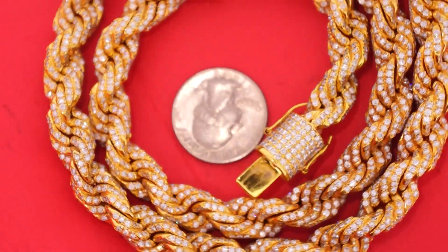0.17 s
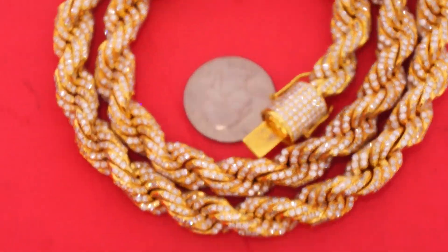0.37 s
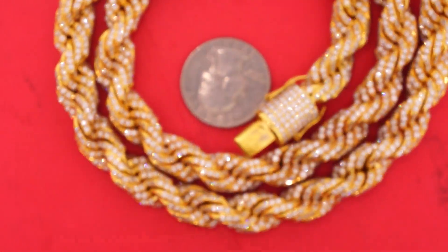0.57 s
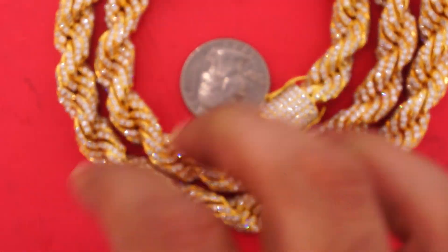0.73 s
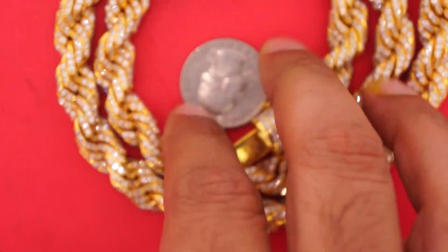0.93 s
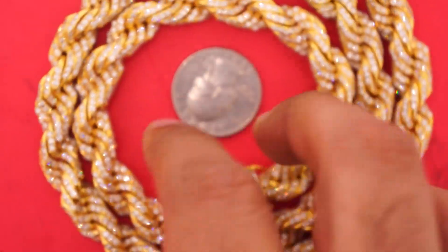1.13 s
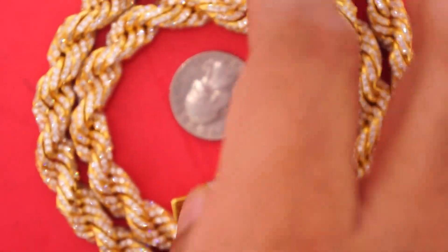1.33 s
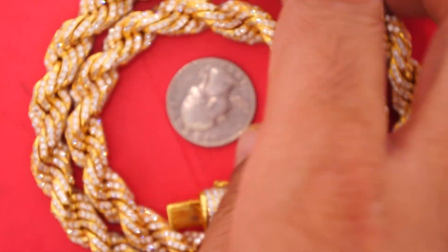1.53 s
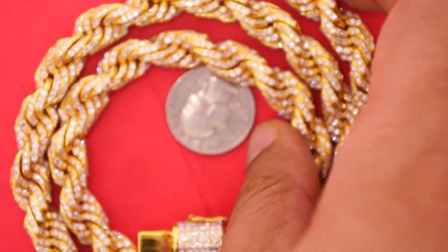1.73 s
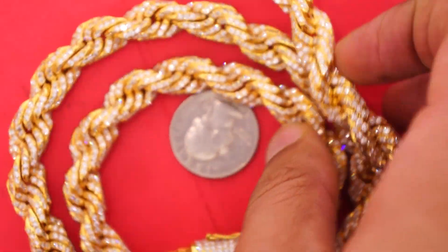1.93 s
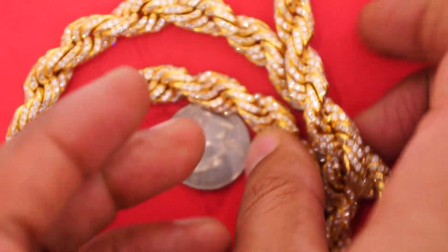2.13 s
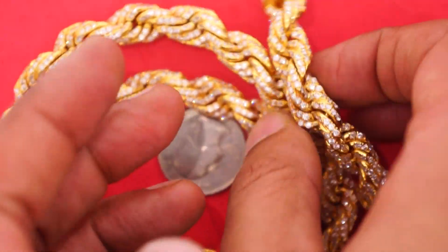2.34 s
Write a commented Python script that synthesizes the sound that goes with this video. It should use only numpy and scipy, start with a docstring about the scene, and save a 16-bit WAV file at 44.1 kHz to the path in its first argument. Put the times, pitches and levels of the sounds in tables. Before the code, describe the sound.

Heavy metal rope chain pushed and gathered on a hollow table, gritty slides, snapping links, dull thumps

```python
"""A quiet room's noise and low hum come first; then hands push and gather a heavy rope chain on a table.
The links slide over the cloth with a gritty hiss, made of dense random clicks filtered band by band.
They snap together in short bursts of the same grit, and rub and thump the hollow top, which booms near 320 Hz.
Resonances make the links ring on contact and sing when drawn taut. A heavy strand makes the top groan,
and late on a coin is brushed once."""
import sys
import numpy as np
from scipy import signal
from scipy.io import wavfile

SR = 44100
rng = np.random.default_rng(int(sys.argv[2]) if len(sys.argv) > 2 else 0)


def unload_audio(sound):
    """Save the sound as a 16-bit wav file, at the path given as the first command line argument."""
    columns = np.transpose(np.atleast_2d(sound))
    # keep every value between -1 and 1, then stretch to whole-number steps
    steps = np.round(np.clip(columns, -1, 1) * 32767)
    wavfile.write(sys.argv[1], SR, steps.astype(np.int16))


N = 110250   # 2.5 s of samples

# Spectrum of the room noise: pitch_hz, relative_level_db (per Hz)
ROOM_SPECTRUM = [(15, -26), (25, -7.5), (72, 1), (317, -1.5), (560, -3), (754, -2), (1020, -8),
                 (1890, -19.5), (2610, -17), (3340, -4), (4870, -49), (12900, -32), (16000, -66)]
# Resonances of the low hum: pitch_hz, width_hz, relative_level_db
HUM_MODES = [(58, 11, 0), (110, 25, -5)]
# Level of the low hum: time_s, level_db
HUM_LEVEL = [(0.0, -53.5), (1.08, -42), (1.13, -46.5), (2.5, -44.5)]
# How alike left and right are in the banded noises: pitch_hz, likeness (0 to 1)
STEREO_LIKENESS = [(60, 0.9), (180, 1), (550, 0.25), (1650, 0.47), (4970, 0.31), (15000, 0.25)]
# How far left and right differ in level: pitch_hz, left_minus_right_db
STEREO_LEAN = [(60, -1), (380, 2), (2380, -2), (15000, -1.5)]
# Chain sliding on the cloth: time_s, relative_level_db, brightness_db_per_octave
SLIDE_CURVE = [(0, -58, -2.5), (.13, -48, -5.5), (.23, -40, -1.5), (.3, -30, -7), (.41, -38, -1),
               (.55, -38.5, -6), (.6, -32.5, -7), (.66, -34, -7.5), (.69, -46, -6.5), (.72, -44, -10.5),
               (.76, -56, -7.5), (.9, -67, 0), (.92, -46.5, -7), (.97, -58.5, 0.5), (1.03, -38, -1),
               (1.11, -41.5, -5), (1.2, -51.5, -3.5), (1.39, -56.5, -5.5), (1.45, -44.5, -4),
               (1.53, -46.5, -3), (1.6, -41.5, -2), (1.72, -41.5, -2.5), (1.8, -46.5, -3.5),
               (1.96, -51.5, -2), (2.09, -47, -3), (2.16, -51, -5.5), (2.33, -53.5, -3), (2.37, -47, -3),
               (2.43, -58, -1.5), (2.5, -54, -3.5)]
# Spectrum of the sliding hiss: pitch_hz, relative_level_db (per Hz)
SLIDE_SPECTRUM = [(450, -24.5), (1000, -17.5), (2000, -12.5), (3300, -7), (5000, -8.5), (8000, -8.5),
                  (12000, -12.5), (15700, -15.5)]
# Weight of the chain rubbing the top: time_s, boom_level_db, upper_modes_relative_db, below_boom_level_db
RUB_CURVE = [(0.0, -61.5, -56.5, -48), (0.24, -50, -34, -60.5), (0.31, -47, -26, -44),
             (0.37, -42.5, -39, -52), (0.46, -36.5, -34, -55), (0.48, -44, -28, -43), (0.54, -28, -45, -45),
             (0.585, -34, -28, -21), (0.67, -35, -37.5, -36), (0.75, -36, -50.5, -31),
             (0.88, -43.5, -59.5, -52), (0.9, -52, -67, -48), (0.91, -46, -50, -60),
             (0.93, -51, -54.5, -35), (0.98, -42.5, -51.5, -43.5), (1.04, -31, -43, -41.5),
             (1.2, -56.5, -52.5, -51.5), (1.38, -61, -66, -52.5), (1.44, -49.5, -54.5, -45.5),
             (1.69, -41.5, -49, -51), (2.03, -45, -59.5, -41.5), (2.11, -39.5, -59, -53),
             (2.2, -32.5, -49.5, -35.5), (2.25, -43, -64, -42), (2.35, -34.5, -61, -43.5),
             (2.5, -61, -71, -54)]
# Air and panel of the hollow top, one after the other: pitch_hz, width_hz
BOOM_STAGES = [(312, 26.2), (338, 97)]
# Resonances of the top below the boom: pitch_hz, width_hz, relative_level_db
UNDER_BOOM_MODES = [(118, 10.6, -2.5), (181, 107, -2), (211, 74, 1.5)]
# Upper resonances of the top: pitch_hz, width_hz, relative_level_db
UPPER_TOP_MODES = [(417, 50, -9.5), (627, 8.4, -6), (704.5, 43, -6), (757, 30, -3.5), (851, 77, -6),
                   (1045, 17, -18.5), (1172, 27, -7.5), (1450, 51, -7.5), (1645, 59, -8.5),
                   (1923, 70, -5.5), (2260, 51, -10), (2535, 450, -22), (3257, 50, -17)]
# Thumps on the top: start_s, level_db, upper_modes_db (compared with the thump)
THUMP_HITS = [(0.167, -31, -34), (0.38, -36, -31), (0.474, -24.5, -29), (0.562, -16.5, -9.5),
              (0.582, -16, -30), (0.699, -35, -2.5), (0.74, -31, -10), (0.769, -25, -27), (0.91, -15, -18),
              (0.93, -26, -32), (1.037, -32.5, -39), (1.085, -36, -11), (1.524, -22.5, -23.5),
              (1.58, -29.5, -25), (1.631, -41, -27), (1.66, -30.5, -22), (1.819, -27, -44),
              (1.891, -28.5, -37), (2.044, -35.5, -36), (2.167, -41, -22), (2.196, -23.5, -34),
              (2.214, -26, -21), (2.313, -39, -18), (2.351, -32, -13)]
# Resonances of the chain links: pitch_hz, width_hz, relative_level_db
CHAIN_MODES = [(4920, 43, 1.5), (6150, 54, 2), (1913, 58, 1.5), (1684, 57, -2.5), (2543, 53, -16.5),
               (3327, 130, 3.5), (8240, 19, -18), (9890, 48, 8), (14700, 990, -8)]
# Links singing while a taut strand is drawn along: time_s, level_db
SING_LEVEL = [(0, -63), (.2, -49), (.58, -42.5), (.66, -44), (.74, -77), (.99, -68), (1.02, -43),
              (1.105, -46), (1.16, -78), (1.4, -72), (1.74, -60), (1.8, -53), (1.86, -61), (1.93, -56.5),
              (2, -68), (2.11, -52), (2.2, -82)]
# Links snapping together:
# start_s, relative_level_db, centre_hz, width_octaves, attack_s, fall_by_60_db_s, left_minus_right_db
SNAP_BURSTS = [(0.166, -24.5, 1570, 0.52, 0.00058, 0.24, -1), (0.236, -2, 3400, 0.39, 0.0027, 0.051, -0.5),
               (0.239, -7, 980, 0.17, .003, 0.12, -4), (0.2862, -3, 4170, 1.14, 0.0045, 0.059, -1),
               (.291, -8, 1490, .8, 0.0042, 0.039, -7), (0.301, -19, 4100, 2.2, 0.00092, 0.23, 1),
               (0.494, -14, 1920, 0.44, 0.0021, 0.12, 0), (0.5645, -5.5, 1600, 0.72, 0.0015, 0.047, 0.5),
               (.575, 0, 4700, 0.81, 0.00034, 0.018, -1), (0.645, -11, 2680, 0.27, 0.0021, 0.094, 2),
               (0.668, -10.5, 6150, 0.83, 0.0032, 0.029, 0), (0.705, -24, 3500, 1.06, 0.0046, 0.061, 1),
               (0.908, -34, 9000, 6.1, 0.0011, 0.04, -1), (.9805, -29.5, 14100, 0.54, .002, 0.068, -4),
               (1.021, -31, 6000, 0.89, 0.0025, 0.092, 0), (1.223, -39, 5860, 0.72, .005, 0.52, 0),
               (1.423, -37.5, 4460, 1.07, 0.004, 0.34, -4), (1.51, -29, 3730, 0.86, 0.0014, 0.048, -2),
               (1.569, -13, 15700, 0.3, 0.005, 0.039, 0), (1.588, -20, 14300, 0.57, .003, 0.085, -2),
               (1.672, -27, 13000, 2.1, .002, 0.086, -1), (1.712, -20.5, 4900, 0.5, 0.0034, 0.093, 2),
               (1.819, -22, 14500, 5, 0.0014, 0.041, -2), (1.861, -21, 14500, 1.6, 0.0073, 0.11, -1),
               (1.883, -27, 14000, 2.2, 0.0021, 0.18, 0), (1.977, -20, 15400, 0.52, 0.002, 0.16, 0),
               (2.001, -15, 13300, 1.44, 0.0022, 0.038, -0.5), (2.02, -25, 14200, 0.34, 0.005, 0.26, -6),
               (2.052, -32.5, 9000, 1.5, .002, 0.27, 2), (2.059, -18.5, 14500, 0.45, 0.003, 0.075, -1),
               (2.087, -29.5, 3800, 0.86, 0.0012, 0.089, -2), (2.197, -31, 13800, 3.2, 0.0087, 0.12, -1),
               (2.2616, -32, 13000, 0.8, 0.0016, 0.046, -2), (2.28, -34.5, 13700, 0.27, .004, 0.34, -2),
               (2.339, -28, 13900, 0.46, .001, 0.31, -4), (2.35, -23.5, 4880, 1.03, 0.0026, 0.04, 2),
               (2.387, -27, 12900, 5, 0.0032, 0.041, 2)]
# Single hard knocks of one link on another: start_s, level_db
KNOCKS = [(0.24, -23), (0.563, -22), (.5757, -19.5), (0.624, -20), (.6282, -16)]
# Groan of the top: pitch_hz, width_hz, relative_level_db
GROAN_MODES = [(176, 18, -6), (355, 10, 2), (585, 20, -8), (752, 25, -2)]
# Heavy strand hauled across the top: time_s, level_db
HAUL_LEVEL = [(.45, -90), (.475, -28), (.545, -25), (.575, -90)]
# Resonances of the coin: pitch_hz, width_hz, relative_level_db
COIN_MODES = [(8930, 40, -2), (12200, 70, -4), (15200, 50, 0), (13900, 60, -14)]
# One brush of the coin: time_s, level_db
COIN_BRUSH_LEVEL = [(2.345, -90), (2.353, -46), (2.39, -50), (2.415, -60), (2.43, -90)]
# Echo delays of the two nearby walls, left then right: delay_s
WALL_DELAYS = (0.0079, .0113)

SIDES = np.array([[1], [-1]])   # left, right
GRIT_PER_S, GRIT_SPREAD_DB = 5000, 1.5   # average contacts a second; unevenness of their sizes
ROOM_DB, ROOM_FLICKER_DB = -59.5, 1.5
SLIDE_GAIN_DB = 8.5
RUB_UPPER_GAIN_DB, RUB_FLUTTER_DB = -4, 1.5
UNDER_THUMP_DB = -13.5   # share of a thump below the boom
CONTACT_HZ = 720   # thumps are dull above this
LINK_SOFT_HZ = 1500   # soft link contacts favour the low modes
SNAP_GAIN_DB = -12
SNAP_SPREAD_DB = 3.5   # snaps hold a few contacts much harder than the rest
SLIDE_RING_DB = -6   # sliding links ring less freely than snapping ones
SMALL_LINKS, SMALL_LINK_Q, SMALL_LINK_DB = 40, 122, 1   # count; pitch divided by width; gain
ECHO_DB = -12
CUTOFF_HZ = 15900


def amp(db):
    """Turn decibels into a gain."""
    return 10 ** (np.asarray(db) / 20)


def rms_one(x):
    """Scale to an average (rms) strength of 1."""
    return x / np.sqrt(np.mean(x ** 2) + 1e-20)


def in_time(rows):
    """Draw straight lines between a table's rows, giving each column a value per sample."""
    time_s, *columns = np.transpose(rows)
    return [np.interp(np.arange(N) / SR, time_s, column) for column in columns]


def at_hz(points, hz):
    """Read a table at one pitch, with pitch spaced by octaves."""
    pitch_hz, value = np.array(points).T
    return np.interp(np.log(hz), np.log(pitch_hz), value)


def drift(rate_hz):
    """Slow random wander of spread 1: smoothed noise, one point every 40 samples."""
    r = np.exp(-80 * np.pi * rate_hz / SR)
    noise = rng.standard_normal(N // 40 + 2002)
    slow = signal.lfilter([1], [1, -2 * r, r * r], noise)[2000:]   # drop the filter's start-up
    return np.interp(np.arange(N) / 40, np.arange(len(slow)), rms_one(slow))


def resonate(x, hz, width_hz):
    """One resonance with gain near 1 at its peak; a narrow one rings longer."""
    r = np.exp(-np.pi * width_hz / SR)
    ring = [1, -2 * r * np.cos(2 * np.pi * hz / SR), r * r]
    return signal.lfilter([1 - r, 0, r - 1], ring, x + 1e-18)   # tiny offset keeps the arithmetic quick


def body(x, modes):
    """Resonances side by side, every second one flipped in sign."""
    return sum(amp(db) * (-1) ** k * resonate(x, hz, width_hz)
               for k, (hz, width_hz, db) in enumerate(modes))


def grit(shape, spread_db=GRIT_SPREAD_DB):
    """Dense small contacts at random moments, of uneven size and random sign."""
    sizes = amp(spread_db * np.minimum(rng.exponential(1, shape), 5))
    signs = rng.choice([-1, 1], shape)
    touching = rng.random(shape) < GRIT_PER_S / SR
    return rms_one(sizes * signs * touching)


def bands(source, gain_at, low_hz, count=3):
    """Split noise into count bands an octave, each with its own gain, stereo likeness and lean."""
    edges = low_hz * 2 ** np.arange(0, np.log2(20500 / low_hz), 1 / count)
    out = 0
    for k, (low, high) in enumerate(zip(edges, edges[1:])):
        hz = np.sqrt(low * high)
        band = signal.butter(2, [low, high], "band", fs=SR, output="sos")
        mid, side = signal.sosfilt(band, source[k % 2])   # neighbouring bands use different noise
        alike = np.clip(at_hz(STEREO_LIKENESS, hz), 0, 1)
        pair = np.sqrt(1 + alike) * mid + np.sqrt(1 - alike) * side * SIDES
        lean = amp(at_hz(STEREO_LEAN, hz) / 2 * SIDES)
        out = out + gain_at(hz) * lean * pair
    return out


def stirred(modes, level, side_db, soft_hz=20000):
    """Grit keeps a set of resonances ringing under a level curve."""
    source = signal.lfilter(*signal.butter(1, soft_hz, fs=SR), grit((2, N)))
    mid, side = body(source, modes)
    return amp(in_time(level)[0]) * rms_one(mid + amp(side_db) * side * SIDES)


def room():
    """Steady noise, flickering gently in each band, over a wavering low hum of stirred resonances."""
    def gain_at(hz):
        return amp(at_hz(ROOM_SPECTRUM, hz) + ROOM_FLICKER_DB * drift(8.6))

    noise = rms_one(bands(rng.standard_normal((2, 2, N)), gain_at, 19.6))
    hum = stirred(HUM_MODES, HUM_LEVEL, side_db=-55.5)
    return amp(ROOM_DB) * noise + amp(at_hz(STEREO_LEAN, 60) / 2 * SIDES) * hum


def slide():
    """Links over cloth make dense grit, flickering partly together and partly band by band."""
    level_db, tilt = in_time(SLIDE_CURVE)
    source, together = grit((2, 2, N)), drift(39)

    def gain_at(hz):
        flicker_db = 0.73 * together + 0.6 * drift(15)
        brightness_db = tilt * np.log2(hz / 4500)
        return amp(at_hz(SLIDE_SPECTRUM, hz) + flicker_db + brightness_db)

    return amp(level_db + SLIDE_GAIN_DB) * bands(source, gain_at, 465.7)


def boom(x):
    """The hollow top swells for a few cycles and dies: resonances in a row."""
    for hz, width_hz in BOOM_STAGES:
        x = resonate(x, hz, width_hz)
    return x


def rubbing():
    """Fluttering grit from the chain's weight keeps the top's resonances humming."""
    boom_db, upper_db, under_db = in_time(RUB_CURVE)
    source = grit((3, N)) * amp(RUB_FLUTTER_DB * drift(40))
    booming = amp(boom_db) * rms_one(boom(source[0]))
    upper = amp(upper_db + RUB_UPPER_GAIN_DB) * rms_one(body(source[1], UPPER_TOP_MODES))
    under = amp(under_db) * rms_one(body(source[2], UNDER_BOOM_MODES))
    return booming + upper + under


def sing():
    """Soft sliding contacts on a taut strand keep the link resonances sounding."""
    return stirred(CHAIN_MODES, SING_LEVEL, side_db=-8, soft_hz=LINK_SOFT_HZ)


def snaps():
    """Each snap is a burst of grit with its own rise, decay, centre and width."""
    t = np.arange(SR // 4) / SR   # a burst lasts at most a quarter second
    shapes = []
    for start_s, db, _, _, attack_s, t60_s, pan_db in SNAP_BURSTS:
        age = t[:N - int(start_s * SR)]
        rise = np.minimum(age / max(attack_s, .0003), 1) ** 2
        level_db = db + SNAP_GAIN_DB + pan_db / 2 * SIDES
        shapes.append(amp(level_db - 60 * age / max(t60_s, .005)) * rise)

    def gain_at(band_hz):
        power = np.zeros((2, N))
        for shape, (start_s, _, hz, octaves, *_) in zip(shapes, SNAP_BURSTS):
            i = int(start_s * SR)
            distance = np.log2(band_hz / hz) / max(octaves, .2)
            weight = np.exp(-distance ** 2) * SR / hz / 4   # strongest at the snap's centre
            power[:, i:i + shape.shape[1]] += weight * shape ** 2
        return np.sqrt(power)

    return bands(grit((2, 2, N), SNAP_SPREAD_DB), gain_at, 587.0, count=5)


def jingle(sliding, snapping):
    """The links ring on their own contacts; snaps also wake many small modes over the treble."""
    places = (np.arange(SMALL_LINKS) + rng.random(SMALL_LINKS)) / SMALL_LINKS
    pitches_hz = 1200 * 13 ** places
    small_modes = [(hz, hz / SMALL_LINK_Q, SMALL_LINK_DB) for hz in pitches_hz]
    link_ring = body(amp(SLIDE_RING_DB) * sliding + snapping, CHAIN_MODES)
    return sliding + snapping + link_ring + body(snapping, small_modes)


def thumps():
    """Each thump is a softened click that sets off the boom and the modes above and below it."""
    start_s, db, upper_db = np.transpose(THUMP_HITS)
    hits = np.zeros((3, N))
    hits[:, (start_s * SR).astype(int)] = amp([db, db + upper_db, db + UNDER_THUMP_DB])
    soft = signal.sosfilt(signal.butter(4, CONTACT_HZ, fs=SR, output="sos"), hits + 1e-18)
    unit = np.max(boom(signal.unit_impulse(SR // 10)))   # boom peak of a bare click
    return (boom(soft[0]) + body(soft[1], UPPER_TOP_MODES) + body(soft[2], UNDER_BOOM_MODES)) / unit


def clinks():
    """Each hard knock is one softened click that sets the link resonances ringing."""
    start_s, db = np.transpose(KNOCKS)
    hits = np.zeros(N)
    hits[(start_s * SR).astype(int)] = amp(db)
    soft = signal.butter(2, LINK_SOFT_HZ, fs=SR)
    one_knock = signal.lfilter(*soft, signal.unit_impulse(SR // 10))
    unit = np.max(body(one_knock, CHAIN_MODES))
    return body(signal.lfilter(*soft, hits), CHAIN_MODES) / unit


def groan():
    """A heavy strand hauled across the top stirs its groaning resonances."""
    return stirred(GROAN_MODES, HAUL_LEVEL, side_db=-16)


def coin():
    """One light brush stirs the coin's high, narrow resonances."""
    return stirred(COIN_MODES, COIN_BRUSH_LEVEL, side_db=-12)


def scene():
    """Add all sources; rubs, thumps and knocks come back from two nearby walls, one on each side."""
    background = room()
    chain = jingle(slide(), snaps())
    top = rubbing() + thumps() + clinks()
    echo = amp(ECHO_DB) * np.stack([np.roll(top, int(delay_s * SR)) for delay_s in WALL_DELAYS])
    return background + chain + top + echo + sing() + groan() + coin()


def record(dry):
    """A steep low-pass filter removes the highest treble."""
    return signal.sosfilt(signal.ellip(12, .5, 70, CUTOFF_HZ, fs=SR, output="sos"), dry)


dry = scene()
out = record(dry)
unload_audio(out)
```